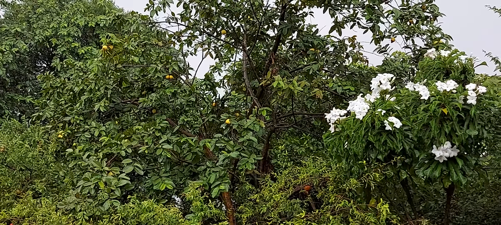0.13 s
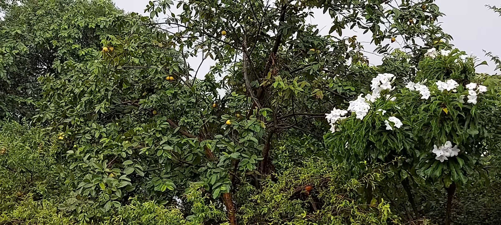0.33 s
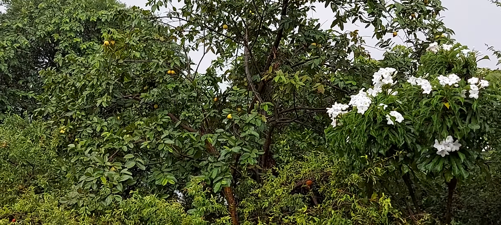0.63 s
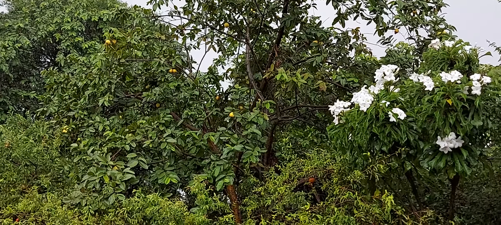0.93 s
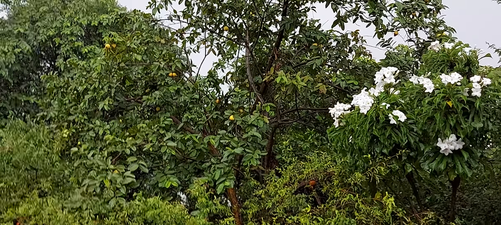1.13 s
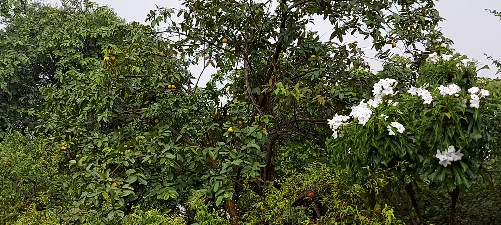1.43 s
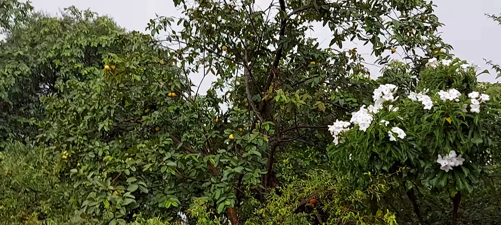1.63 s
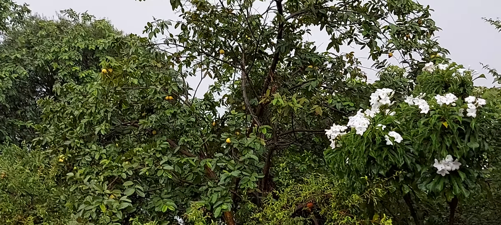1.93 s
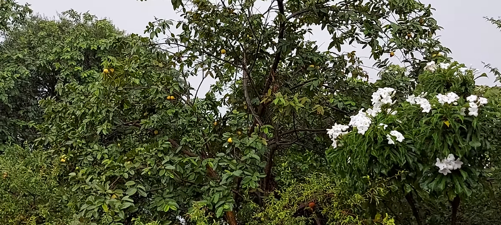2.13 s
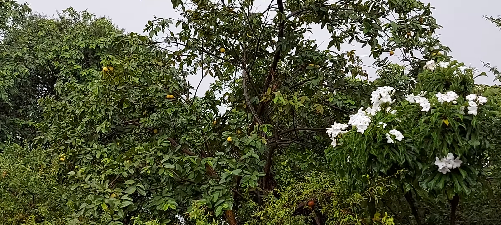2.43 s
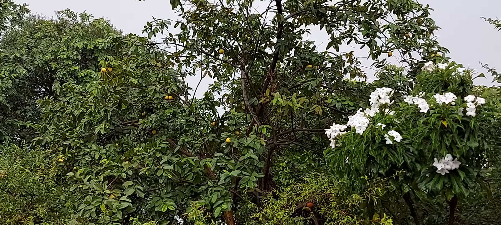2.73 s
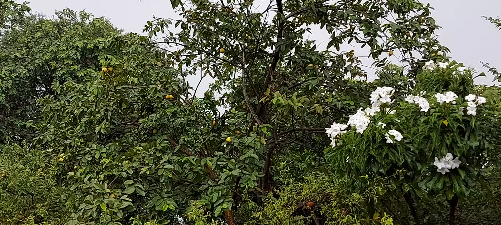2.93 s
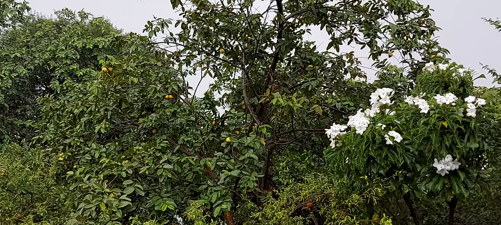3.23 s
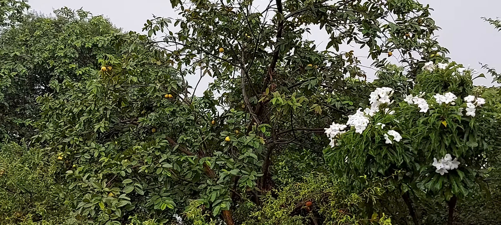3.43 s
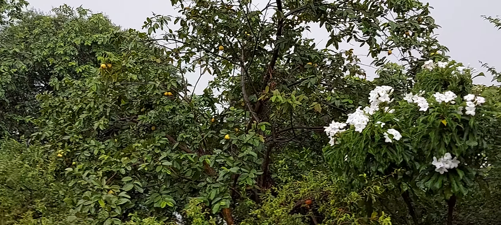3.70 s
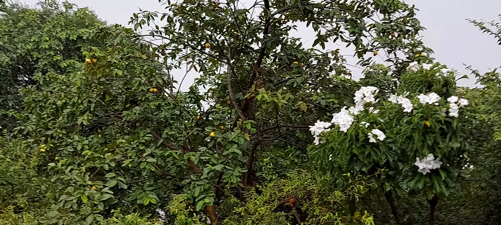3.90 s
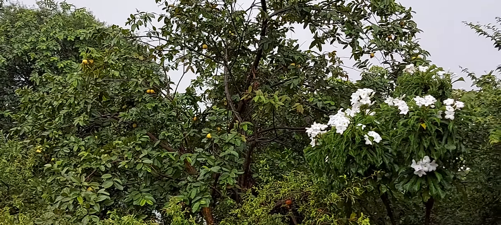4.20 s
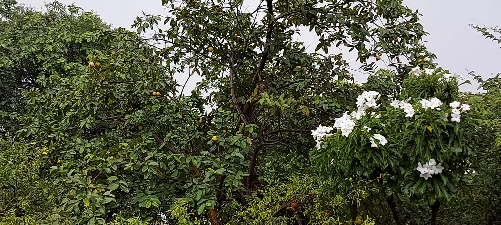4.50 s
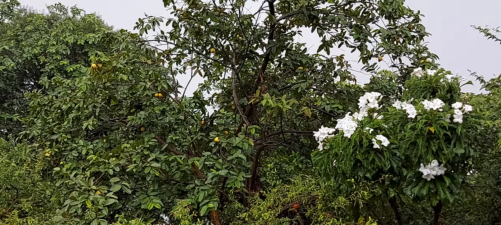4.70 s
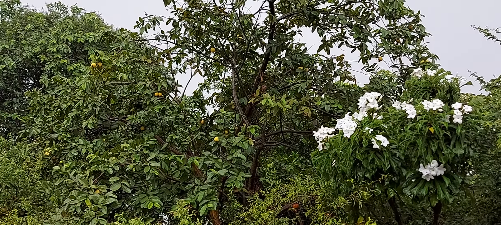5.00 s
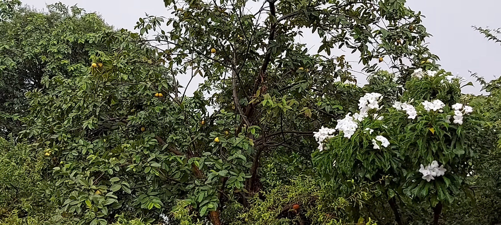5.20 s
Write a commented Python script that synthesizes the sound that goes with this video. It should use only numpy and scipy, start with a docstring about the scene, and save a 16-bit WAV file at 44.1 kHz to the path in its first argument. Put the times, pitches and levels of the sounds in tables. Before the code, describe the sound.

Steady rain falls on dense garden foliage, a wide soft wash with a fine airy hiss and gentle flurries. Thunder is already stirring at the start and swells from about 0.3 s; overlapping deep peals roll unevenly with a muffled, growling edge. Dull booms land strongest between 0.6 and 0.9 s, with weaker ones around 1.5 to 2 s. The microphone's automatic level pulls the rain down beneath the thunder. A faint, high bird whistle falls and wavers near 0.8 s, blurred by echoes. After 2 s the thunder drops away, leaving low grumbles that return weakly near 2.6, 4.2 and 5 s. The rain gradually comes forward again. Crisp, tiny ticks of drops on nearby leaves scatter throughout, clearer around 2.1 to 2.3, 3.3, 4.3 and 5.1 s. Another very brief, faint whistle comes near 5 s.

```python
"""In a leafy garden, distant thunder rolls over steady rain.
Overlapping peals of crackling noise and a few dull booms fade, then roll up again.
The rain is countless tiny clicks merged into a hiss; automatic gain control makes it sink
under the thunder and slowly return. Close drops tick on leaves as short noise bursts,
and a far bird whistles faintly with falling, wavering tones."""
import sys
import numpy as np
from scipy import signal
from scipy.fft import rfft, irfft
from scipy.io import wavfile
from scipy.ndimage import uniform_filter1d, minimum_filter1d

SR = 44100
rng = np.random.default_rng(int(sys.argv[2]) if len(sys.argv) > 2 else 0)


def wav_record(signal):
    """Record a signal, one row per channel, as 16-bit PCM in the file named by sys.argv[1]."""
    frames = np.transpose(np.atleast_2d(signal))
    bounded = np.clip(frames, -1, 1)
    # unit amplitude maps onto the largest positive 16-bit level
    quanta = np.round(bounded * 32767).astype(np.int16)
    wavfile.write(sys.argv[1], SR, quanta)


N = 236012
TIME = np.arange(N) / SR   # seconds

# Peals of thunder, levels before the later mixing: start_s, level_db, hold_s, brightness_db
THUNDER_PEALS = [(-0.1, -24, 0.42, -8.5), (0.307, -17, 0.15, -6.5), (0.44, -11.5, 0.13, -7.5),
                 (0.6, -10.5, 0.091, -17), (0.89, -14, 0.23, -8), (1.176, -13, 0.085, -10.5),
                 (1.385, -12, .15, -10), (1.668, -12.5, 0.2, -8.5), (2.04, -22.5, 0.35, -6),
                 (2.555, -22, 0.087, -4.5), (2.826, -28, 0.016, -4), (3.52, -28.5, .12, -5.7),
                 (3.846, -31, 0.073, -3), (4.177, -27, 0.26, -10.5), (4.878, -25, 0.13, -9.8),
                 (5.188, -27.5, .12, -8)]
PEAL_RISE_S, PEAL_FADE_DB_PER_S = 0.067, 28.5
ECHO_DB, ECHO_BRIGHTNESS_DB = -31.5, -5.5   # the lingering echo between peals
RUMBLE_DB, GROWL_DB, RASP_DB = -0.5, 0.06, -5.5   # added to each peal's level
RASP_PER_BRIGHTNESS = 1.57   # air absorbs the rasp faster than the growl: dB per dB
# The strongest shock fronts, peaks relative to each other: start_s, peak_db, length_s
SHOCK_FRONTS = [(0.374, -10, 0.0089), (0.5, -13, 0.0047), (0.611, -0.5, 0.0063), (0.724, -4.5, 0.0086),
                (0.743, -1, 0.0053), (0.883, -2.5, 0.0061), (1.463, -12, 0.0131), (1.733, -15, 0.013),
                (1.843, -11, 0.0089), (2.008, -16, .021), (2.891, -22, 0.0058), (4.957, -20, 0.011),
                (5.089, -22, .014)]
# Tone colours of the thunder, from deep to rough: pitch_hz, level_db (per Hz)
RUMBLE_COLOUR = [(20, -46), (32, -22), (42, -13), (52, -0.5), (80, 0.5), (110, 3.5), (165, -1), (215, -3),
                 (260, -6), (330, -34), (500, -75)]
GROWL_COLOUR = [(110, -64), (170, -1), (240, -7.5), (290, 3.5), (365, -2), (410, -7), (460, -30),
                (560, -29), (900, -62)]
RASP_COLOUR = [(280, -35), (400, -3), (450, 1.5), (530, 2), (670, -4.5), (800, -17), (1100, -31.5),
               (2500, -67)]
# Thunder scattered from all sides, against the direct part: pitch_hz, level_db
SCATTER_COLOUR = [(60, -20), (130, -26), (250, -20), (380, -31), (500, -12), (800, -2)]
# Peaks and dips that nearby walls give the thunder: pitch_hz, width_hz, boost_db
WALL_RESONANCES = [(104, 24, 0), (144.4, 11, -3), (160.4, 21, 2.5), (217, 8.8, -1), (377, 58, -0.5),
                   (483, 15, -1.5), (521, 28.5, 4)]
THUNDER_LAG_S = 0.00023   # the right side hears thunder this much later

WASH_DB, HISS_DB, PATTER_DB = -37, -42.5, -54   # layers of the steady rain
RAIN_GROWS_DB_PER_S = 0.2
# Tone colours of the rain, far wash and finer hiss: pitch_hz, level_db (per Hz)
WASH_COLOUR = [(100, -12.5), (300, 7.5), (600, 3.5), (900, 0.5), (1200, 0), (1650, -1), (2300, -4.5),
               (3000, -7), (4300, -6), (5500, -18), (9000, -35)]
HISS_COLOUR = [(1500, -11), (3000, 1), (4300, -3), (5200, 1), (7000, 1), (9000, 1), (11800, -1.5),
               (13500, -5.5), (16000, -10)]
# How alike the rain is on the left and right: pitch_hz, correlation (-1 to 1)
RAIN_LIKENESS = [(100, 0.85), (400, 0.98), (600, 0.94), (750, -0.056), (900, -0.44), (1250, -0.53),
                 (1550, 0.034), (1900, 0.051), (3000, -0.068), (16000, 0)]

# Big drops on near leaves (plus pan is left): start_s, peak_db, pitch_hz, left_over_right_db
BIG_DROPS = [(0.127, -24, 12500, -5), (0.375, -26.5, 12500, 6), (2.077, -22, 9500, 1),
             (2.133, -24, 12500, 8), (2.2708, -19, 13100, 3), (3.320, -24, 11000, -2),
             (4.2987, -20, 11400, 2), (5.134, -20, 9500, 2)]
SMALL_DROPS_PER_S, SMALL_DROP_DB, SMALL_DROP_HZ, SMALL_DROP_PAN_DB = 2.5, -32, 11500, 3.5

# The bird's whistles, levels before the echoes: start_s, length_s, start_pitch_hz, level_db
BIRD_WHISTLES = [(0.803, 0.24, 3790, -45.5), (4.987, .065, 3550, -46.5)]
WHISTLE_SAG_HZ_PER_S3 = 55000   # the pitch holds, then falls with the cube of the time

# Resonances of the two microphone ports: pitch_hz, width_hz, boost_db
LEFT_PORT_RESONANCES = [(907, 80, 4), (1314, 430, 3.5), (1610, 105, -3), (1792, 120, 10.5),
                        (2550, 1200, -1.5), (7430, 3340, -8), (9900, 8800, 4.5)]
RIGHT_PORT_RESONANCES = [(1400, 800, -2), (1930, 65, 6), (4270, 300, 1), (8240, 1800, 0), (10240, 980, -13)]
AGC_THRESHOLD_DB, AGC_SLOPE = -20.5, 0.45   # gain control: dB of cut per dB over the threshold
AGC_SENSE_S, AGC_ATTACK_S, AGC_HOLD_S, AGC_RELEASE_DB_PER_S = 0.074, 0.017, 0.94, 3
CUTOFF_HZ = 16000


def thunder():
    """Rumble, growl, rasp and booms come from the left, so the right side hears them late."""
    rumble = peal_strength(0) * rolling(RUMBLE_COLOUR, fronts_per_s=1000, swell_s=0.051)
    growl = peal_strength(1) * rolling(GROWL_COLOUR, fronts_per_s=1200, swell_s=0.096)
    rasp = peal_strength(RASP_PER_BRIGHTNESS) * rolling(RASP_COLOUR, fronts_per_s=1200, swell_s=0.074)
    rolls = from_db(RUMBLE_DB) * rumble + from_db(GROWL_DB) * growl + from_db(RASP_DB) * rasp
    dull_booms = booms(low_share=0.75, high_share=1.53, lowest_hz=46.3, boom_db=2.4)
    left, right = resonate(rolls + dull_booms, WALL_RESONANCES)
    late_right = np.interp(TIME - THUNDER_LAG_S, TIME, right)
    return np.array([left, late_right]) * panned(0.66)


def peal_strength(per_brightness):
    """Each peal swells, holds and dies away; peals add in power over the lingering echo."""
    power = from_db(ECHO_DB + per_brightness * ECHO_BRIGHTNESS_DB) ** 2
    for start_s, level_db, hold_s, brightness_db in THUNDER_PEALS:
        rise = np.clip((TIME - start_s) / PEAL_RISE_S, 0, 1)
        fading_s = np.maximum(TIME - start_s - PEAL_RISE_S - hold_s, 0)
        peal_db = level_db + per_brightness * brightness_db - PEAL_FADE_DB_PER_S * fading_s
        power = power + (rise * from_db(peal_db)) ** 2
    return np.sqrt(power)


def rolling(spectrum, fronts_per_s, swell_s):
    """Fronts from all along the lightning channel pile up into a stereo roll of even strength."""
    direct = colour(impacts(fronts_per_s, 2.18), spectrum)
    scattered = colour(colour(impacts(fronts_per_s, 2.6), spectrum), SCATTER_COLOUR)
    # Dividing by the smoothed strength evens out the roll
    width = max(int(swell_s * SR), 1)
    power = uniform_filter1d(uniform_filter1d(direct ** 2, width), width)
    return np.array([direct + scattered, direct - scattered]) / np.sqrt(power + 1e-12)


def booms(low_share, high_share, lowest_hz, boom_db):
    """N-shaped pressure waves, rounded off by kilometres of air: the longer, the deeper."""
    out = np.zeros(N)
    for start_s, peak_db, length_s in SHOCK_FRONTS:
        at = int(start_s * SR)
        phase = TIME[:min(SR // 5, N - at)] / length_s
        n_wave = (1 - 2 * phase) * (phase < 1)   # jump up, slope down, jump back
        wave = band(n_wave, low_share / length_s, high_share / length_s)
        out[at:at + len(wave)] += from_db(peak_db + boom_db) * wave / np.abs(wave).max()
    low_cut = signal.butter(6, lowest_hz, "high", fs=SR, output="sos")
    return signal.sosfilt(low_cut, out + 1e-18)


def rain():
    """A far wash, a finer hiss from the foliage and nearer patter, all wavering in small flurries."""
    # Slow random wavering, mostly slower than 4 Hz
    flurry_colour = [(1.5, 14), (4, -10), (9, -10), (25, -21), (200, -100)]
    flurry = rms_one(colour(rng.standard_normal(N), flurry_colour))
    wash = from_db(WASH_DB + 0.36 * flurry) * shower(WASH_COLOUR, drops_per_s=16000, spread_db=2.0)
    hiss = from_db(HISS_DB + 0.57 * flurry) * shower(HISS_COLOUR, drops_per_s=25000, spread_db=2.5)
    patter = from_db(PATTER_DB + 1.8 * flurry) * shower(HISS_COLOUR, drops_per_s=160, spread_db=4.5)
    growth = from_db(RAIN_GROWS_DB_PER_S * (TIME - TIME.mean()))
    return (wash + hiss + patter) * growth


def shower(spectrum, drops_per_s, spread_db):
    """Many random drops from all around add up to one stereo texture."""
    alike = np.clip(per_bin(RAIN_LIKENESS), -1, 1)
    one = rfft(impacts(drops_per_s, spread_db))
    other = rfft(impacts(drops_per_s, spread_db))
    mid = np.sqrt(1 + alike) * (one + other)
    side = np.sqrt(1 - alike) * (one - other)
    stereo = irfft(np.array([mid + side, mid - side]), N)
    return rms_one(colour(stereo, spectrum))


def near_drops(tick_s, spray_t60, spray_db):
    """A drop lands on a leaf with a sharp tick, then throws a fine spray; small ones fall at random."""
    out, age = np.zeros((2, N)), TIME[:SR // 10]
    small_starts = TIME[rng.random(N) < SMALL_DROPS_PER_S / SR]
    small = [(s, SMALL_DROP_DB, SMALL_DROP_HZ, SMALL_DROP_PAN_DB) for s in small_starts]
    for start_s, peak_db, pitch_hz, pan_db in BIG_DROPS + small:
        tick = age / tick_s * np.exp(1 - age / tick_s)
        # The spray fades by 60 dB in spray_t60 seconds
        spray = from_db(spray_db - 60 * age / spray_t60) * (1 - np.exp(-age / tick_s))
        noise = rng.standard_normal((2, len(age)))
        splash = band(noise * (tick + spray), pitch_hz * 0.55, pitch_hz * 1.15)
        splash = splash / np.abs(splash).max(axis=1, keepdims=True)
        at = int(start_s * SR)
        out[:, at:at + len(age)] += (from_db(peak_db) * panned(pan_db) * splash)[:, :N - at]
    return out


def bird(waver, echo_db):
    """Thin whistles swell and fade as they fall ever faster, blurred by echoes among the trees."""
    song = np.zeros(N)
    for start_s, length_s, start_hz, level_db in BIRD_WHISTLES:
        age = np.clip(TIME - start_s, 0, length_s)
        falling_hz = start_hz - WHISTLE_SAG_HZ_PER_S3 * age ** 3
        trembling = rms_one(band(rng.standard_normal(N), 34, 120))
        pitch_hz = falling_hz * (1 + waver * trembling)
        tone = np.sin(2 * np.pi * np.cumsum(pitch_hz) / SR)
        song += from_db(level_db) * np.sin(np.pi * age / length_s) * tone
    # Fading noise stands for a crowd of echoes
    echo_age = TIME[:SR // 4]
    echoes = rng.standard_normal((2, len(echo_age))) * from_db(-60 * echo_age / 0.36)
    echoes /= np.linalg.norm(echoes, axis=1, keepdims=True)
    return song + from_db(echo_db) * signal.fftconvolve(song[None], echoes, axes=1)[:, :N]


def impacts(per_s, spread_db):
    """Clicks at random moments, many small and a few large; rms 1."""
    sizes = from_db(spread_db * np.minimum(rng.exponential(1, N), 5)) * rng.choice([-1, 1], N)
    return rms_one(sizes * (rng.random(N) < per_s / SR))


def from_db(db):
    """Turn decibels into a gain factor."""
    return 10 ** (np.asarray(db) / 20)


def rms_one(x):
    """Scale to an average strength (rms) of 1."""
    return x / np.sqrt(np.mean(x ** 2) + 1e-20)


def per_bin(points):
    """Read a table over log frequency at every Fourier bin."""
    hz, value = np.transpose(points)
    bins_hz = np.maximum(np.fft.rfftfreq(N, 1 / SR), 1)
    return np.interp(np.log(bins_hz), np.log(hz), value)


def colour(x, spectrum):
    """Shape the tone with a table of pitch_hz and level_db."""
    return irfft(rfft(x) * from_db(per_bin(spectrum)), N)


def band(x, low_hz, high_hz):
    """Keep only the sound between two frequencies."""
    sos = signal.butter(2, [low_hz, min(high_hz, 0.47 * SR)], "band", fs=SR, output="sos")
    return signal.sosfilt(sos, x + 1e-18)


def smooth(x, time_s):
    """Follow a signal with a lag."""
    keep = np.exp(-1 / (time_s * SR))
    return signal.lfilter([1 - keep], [1, -keep], x)


def resonate(x, resonances):
    """Boost or dip the sound around each listed frequency, one after another."""
    for hz, width_hz, boost_db in resonances:
        turn = -2 * np.cos(2 * np.pi * hz / SR)
        half = np.tan(np.pi * width_hz / SR)
        gain = from_db(boost_db / 2)
        top = [1 + half * gain, turn, 1 - half * gain]
        bottom = [1 + half / gain, turn, 1 - half / gain]
        x = signal.lfilter(top, bottom, x)
    return x


def panned(db):
    """Left and right gains for a level difference; plus favours the left."""
    return from_db(np.array([[db], [-db]]) / 2)


def scene():
    """Thunder, rain, near drops and the bird sound together."""
    drops = near_drops(tick_s=0.00028, spray_t60=0.12, spray_db=-11.5)
    return thunder() + rain() + drops + bird(waver=0.0054, echo_db=-4)


def gain_control(x):
    """Loud sound turns the gain down; it stays down for a while, then creeps back."""
    power = smooth(np.mean(x ** 2, axis=0), AGC_SENSE_S)
    level_db = 10 * np.log10(power + 1e-12)
    wanted_db = -AGC_SLOPE * np.maximum(level_db - AGC_THRESHOLD_DB, 0)
    # Hold the lowest gain of the last moments
    hold = max(int(AGC_HOLD_S * SR), 1)
    held_db = minimum_filter1d(wanted_db, hold, origin=(hold - 1) // 2, mode="nearest")
    # Let the gain rise no faster than the release
    creep_db = AGC_RELEASE_DB_PER_S * TIME
    gain_db = np.minimum.accumulate(held_db - creep_db) + creep_db
    return x * from_db(smooth(gain_db, AGC_ATTACK_S))


def record(dry):
    """Each port colours its side, the gain control rides the thunder and the top is cut steeply."""
    left = resonate(dry[0], LEFT_PORT_RESONANCES)
    right = resonate(dry[1], RIGHT_PORT_RESONANCES)
    heard = gain_control(np.array([left, right]))
    top_cut = signal.ellip(12, 0.1, 80, CUTOFF_HZ, fs=SR, output="sos")
    return signal.sosfilt(top_cut, heard)


dry = scene()
out = record(dry)
wav_record(out)
```